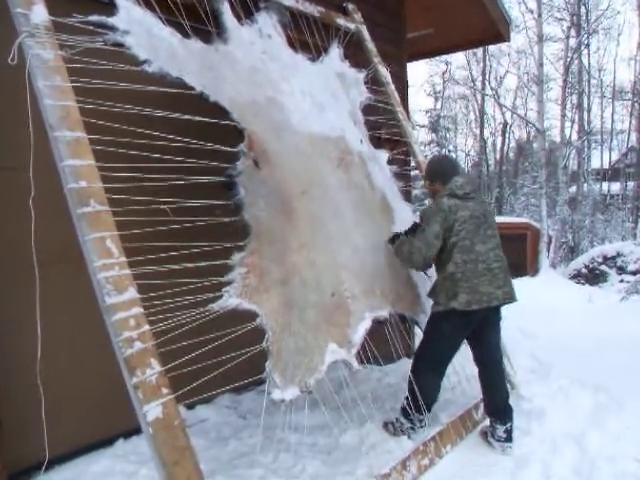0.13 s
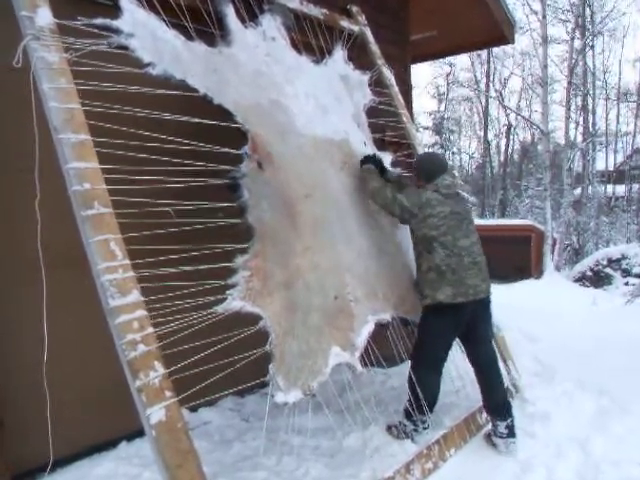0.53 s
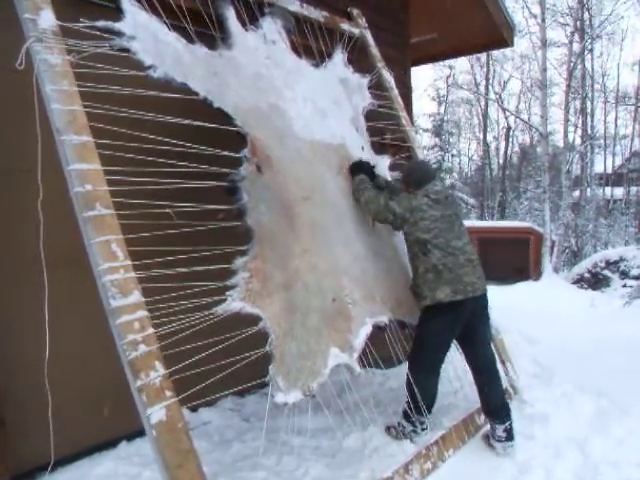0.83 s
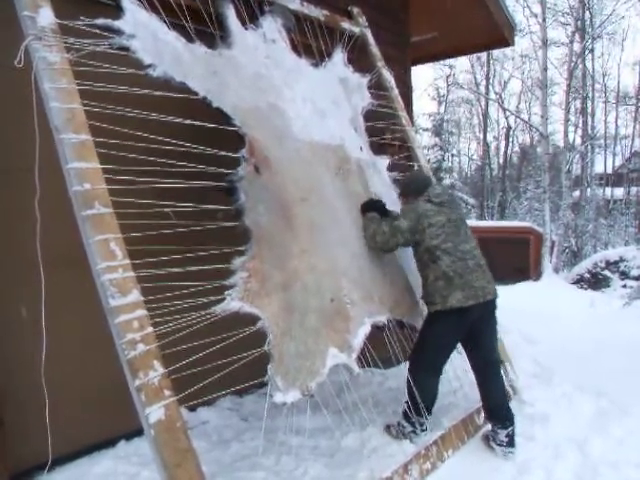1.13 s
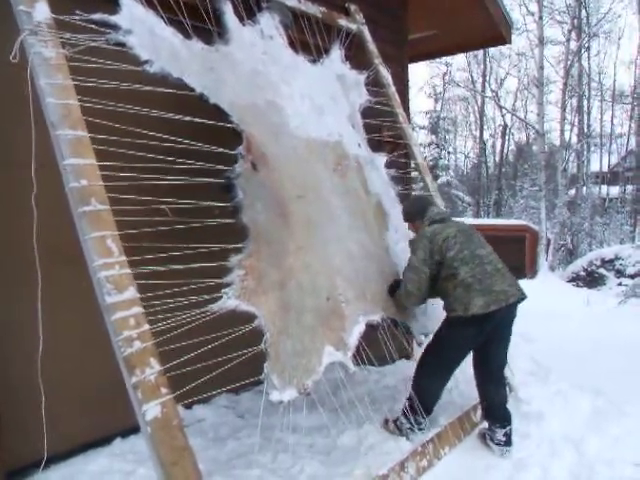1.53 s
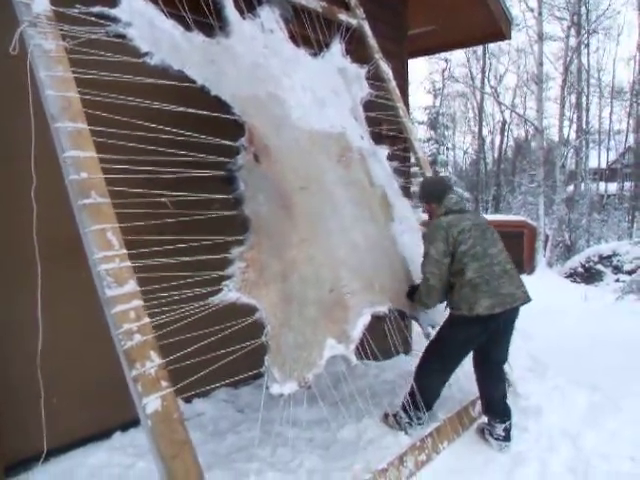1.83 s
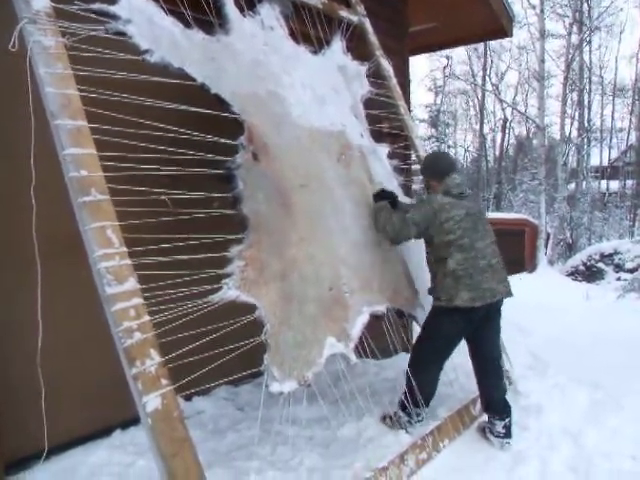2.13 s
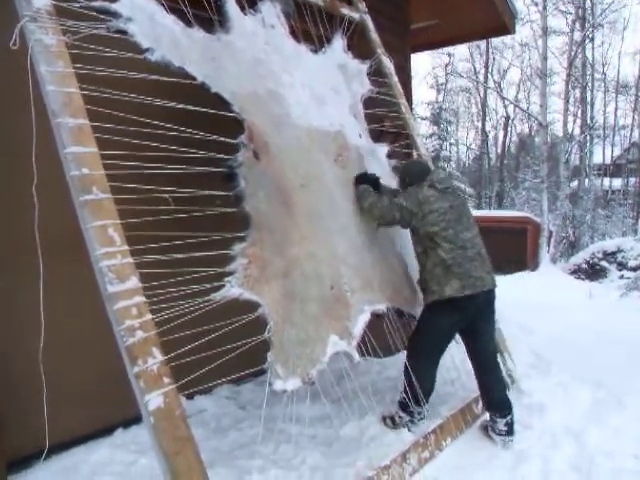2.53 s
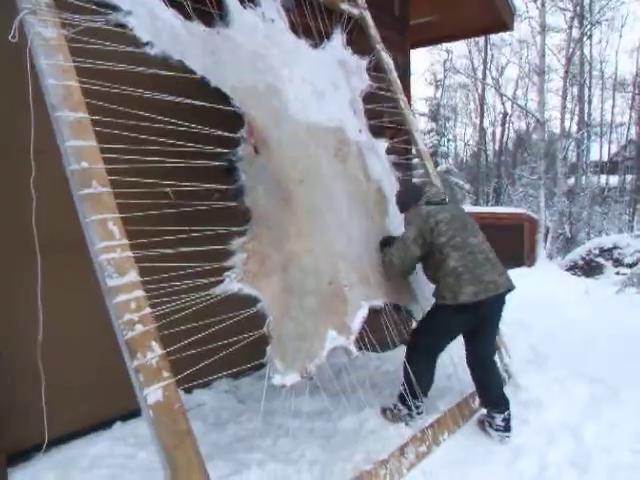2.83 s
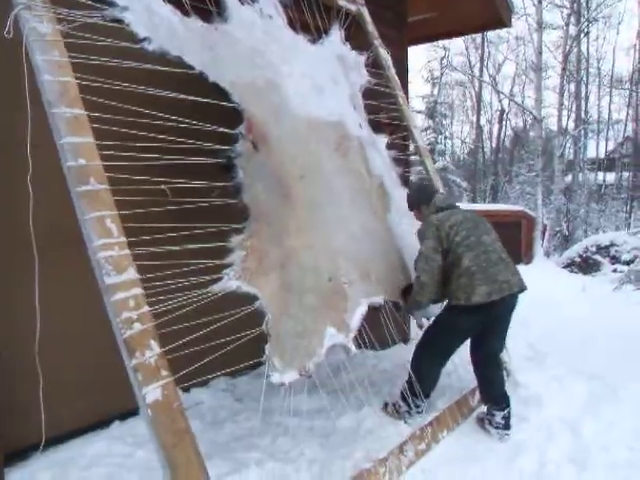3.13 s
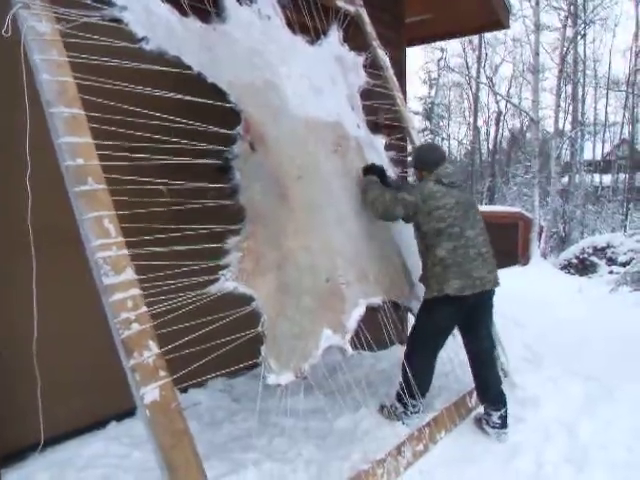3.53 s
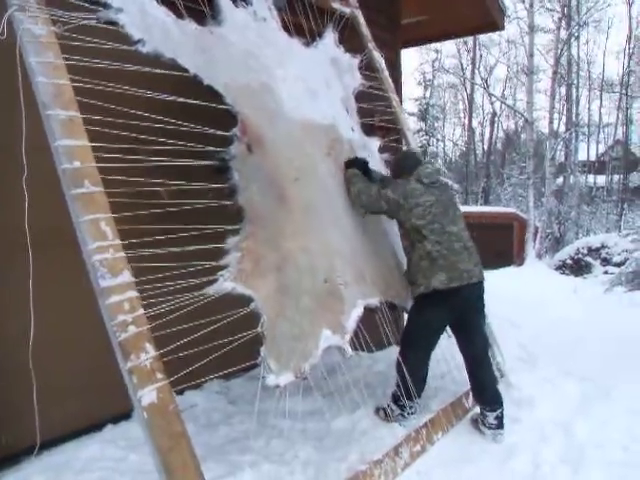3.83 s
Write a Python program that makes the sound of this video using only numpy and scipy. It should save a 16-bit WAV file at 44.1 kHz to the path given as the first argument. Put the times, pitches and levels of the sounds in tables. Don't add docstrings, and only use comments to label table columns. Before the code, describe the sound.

Long rough scrapes on taut, stiff skin, the first ringing with steel, separated by quiet gaps with faint chirps and a twig-like crack. Dry open yard, lo-fi small camera microphone, a loud plastic click before the last scrape.

```python
import sys
import numpy as np
from scipy import signal
from scipy.io import wavfile
from scipy.ndimage import uniform_filter1d, map_coordinates

SR = 44100
rng = np.random.default_rng(int(sys.argv[2]) if len(sys.argv) > 2 else 0)


def elevation(decibels):
    levels = np.asarray(decibels, float)
    return 10 ** (levels / 20)


def generate_wav(signal):
    frames = np.transpose(np.atleast_2d(signal))
    scaled = np.clip(frames, -1, 1) * 32767
    pcm = np.round(scaled).astype(np.int16)
    wavfile.write(sys.argv[1], SR, pcm)


N = 176400
T = np.arange(N) / SR

# (time [s], pressure [dB], edge brightness [dB],
# drumming of the skin [dB], shaking of the frame [dB])
PULL_1_START = [
    (0.79, -58.5, -13, -15, -29),
    (0.842, -47.5, 2, 3.5, -30),
    (0.87, -47, -6.5, -21, -53),
    (0.896, -41, -2, -12, -11),
    (0.998, -39, -4.5, 3.5, -42.5),
    (1.032, -40.5, -1, -2, -8.5),
    (1.144, -33, -4, 4, -11),
    (1.176, -30.5, -5.5, -5, -18),
    (1.2, -38, 0, 0, -11),
]
PULL_1_MIDDLE = [
    (1.2, -40, 2, -10, -14),
    (1.353, -32.5, -5, -5, -14),
    (1.374, -35, -2.5, -8.5, -28),
    (1.515, -35, -1, -6, -14.5),
    (1.612, -28.5, -7, -8, -14),
    (1.654, -38, -4.5, -4, -19.5),
    (1.681, -36.5, -6, -4, -18.5),
]
PULL_1_END = [
    (1.68, -18, -7, -8, -16),
    (1.693, -42, -0.5, -3, -13),
    (1.738, -35, -4, -31.5, -12.5),
    (1.754, -37.5, 2, -29, -20),
    (1.798, -33.5, 1, -19, -23),
    (1.92, -67.5, -8, -12, -9.5),
    (1.92, -63.5, -8.5, -21, -14),
]
PULL_2_START = [
    (2.47, -71, -8, 21, -4),
    (2.5, -46.5, -4, -7, -12.5),
    (2.634, -33, -6.5, 7.5, -10),
    (2.682, -35.5, -1, -5.5, -12.5),
    (2.798, -30.5, -7, -4, -25),
    (2.836, -36, 0, -13.5, -10.5),
    (2.892, -29.5, -8, -22, -39),
    (2.9, -38, 1.5, -3.5, -15),
]
PULL_2_END = [
    (2.9, -36, -2, -13, -21),
    (2.948, -32, -3, -9.5, -15.5),
    (3.032, -28, -6.5, -10, -12),
    (3.086, -41, -3.5, 0.5, -10.5),
    (3.15, -36.5, -3.5, -20, -17),
    (3.166, -29, -11, -13.5, -18),
    (3.2, -36, -2, -6.5, -17),
    (3.256, -56, -0.5, -20.5, -10),
    (3.3, -64, 11, -14.5, -0.5),
]
PULL_3 = [
    (3.829, -64, 10.5, -12.5, -11),
    (3.848, -42, -24, -18, -40.5),
    (3.857, -47.5, -6, -4, -5.5),
    (3.983, -32.5, -8.5, 5, -5.5),
    (3.99, -34.5, -5, 6, -15.5),
]
STEEL_PULL_DB = [
    0,
    -11,
    -10,
]

# (frequency [Hz], width [Hz], level [dB]) # main rings of the
SKIN = [(795, 240, 1.5), (1045, 240, 1.5), (1309, 290, -1.5), (1915, 640, -6)]
EDGE = [(2353, 530, -5.5), (2850, 550, -7), (3663, 920, -7.5), (4400, 1000, -4), (5400, 2500, -6),
        (6620, 2400, -7), (8480, 2200, 1)]
DRUM = [(182.7, 34, -2.5), (262, 79, -6.5), (310.3, 65, 2.5), (532, 210, -0.5)]
FRAME = [(60, 37, -4.5), (79.2, 66, -2.5), (137.7, 35, -1)]
STEEL = [(2720, 90, -2), (2880, 90, 0), (3690, 80, -3), (4530, 120, -5)]
PATCHES = [(611.7, 26, -10), (841.4, 28, 2.5), (999, 61, 4.5), (1107.6, 26, 0.5), (1355, 45, 0),
           (1492, 46, 0), (1533, 44, -2), (1694, 28, -2.5), (1845, 32, -6.5)]
SLACK = [(606, 280, 0.5), (771.5, 130, -2)]
TIGHT = [(1428, 210, 0.5), (1765, 400, -1.5)]

# (time [s], peak level [dB], brightness [dB])
TAPS = [
    (0.729, -29.5, -2.5),
    (0.978, -23.5, 13),
    (2.436, -27, 0),
    (3.442, -35, 15),
    (3.747, -28.5, -4),
    (3.847, -32.5, 2.5),
]
# (frequency [Hz], level [dB], time to fall 60 dB [s])
TAP_MODES = [(103, -19.5, 0.11), (215, -7, 0.046), (340, 6, 0.018), (513, -17, 0.007), (660, 9, 0.019),
             (940, 0.5, 0.0092), (1420, 1, 0.0017)]
# (time
# [s], peak level [dB], share of lows [dB], pitch factor)
TICKS = [(.0008, -35.5, -30, .9), (.0021, -30.5, -30, 1), (.0082, -27, -31.5, .82),
         (.1245, -37.5, -35, 1.1), (1.954, -42, -16, 0.84), (1.982, -45, -19, .98),
         (2.006, -30.5, -25, .82), (2.0092, -35.5, -25, 1.1), (2.019, -39, -20, .95),
         (2.054, -36.5, -9, .99), (2.088, -37, -11, .9), (2.309, -42, 15.5, 1.3), (2.406, -43.5, 0, 1.1),
         (3.096, -31, -16, 1), (3.323, -34, 10, .9), (3.4405, -38, -20, 0.25), (3.8445, -36.5, -20.5, 0.14),
         (3.7852, -54, 14, 0.89), (3.7876, -40, 14.5, 0.45), (3.7888, -18.5, 20, 1.1),
         (3.7966, -1, -8.5, 1.006)]
# (frequency [Hz], level [dB], time to fall 60 dB [s])
TICK_HIGH = [(7106, 12.5, 0.0026), (5800, -10.5, 0.0051), (4380, -10.5, 0.0036)]
# (frequency [Hz], level [dB], time to fall 60 dB [s])
TICK_LOW = [(2760, 15, 0.0023), (1273, -7.5, 0.011), (1930, -18, 0.018)]
# (time [s], peak level [dB])
CRACKS = [
    (3.5708, -24),
    (3.5691, -18),
    (3.5748, -32.5),
]
# (frequency [Hz], level [dB], time to fall 60 dB [s])
CRACK_MODES = [(2370, 3, 0.005), (4600, 10.5, 0.003), (4060, -4.5, 0.0066), (6650, 2, 0.016),
               (7010, 4.5, 0.0048), (1203, -6, 0.011)]

# (time [s], length [s], first frequency [Hz], settled frequency [Hz], level [dB])
NOTES = [
    (1.307, 0.045, 6470, 6690, -34.5),
    (1.424, 0.03, 6210, 6340, -28.5),
    (2.301, 0.033, 7250, 7795, -42),
    (2.326, .03, 7950, 8030, -39.5),
    (3.1, 0.027, 5980, 6560, -30),
    (3.208, 0.033, 5800, 6490, -30.5),
    (3.277, 0.03, 6400, 6730, -54.5),
]
BUZZES = [
    (0.785, 0.014, 5200, 7100, -50.5),
    (0.584, 0.016, 7400, 6500, -47.5),
    (0.67, 0.016, 7100, 6200, -49),
    (4.4, 0.012, 4800, 4600, -42),
    (0.91, 0.054, 2850, 2500, -44),
    (3.284, 0.0086, 3120, 3110, -39),
    (3.332, .02, 4410, 4280, -51),
]
TRILLS = [
    (0.889, 0.091, 7400, 7790, -36.5),
    (1.472, 0.025, 4400, 4850, -39),
    (3.266, 0.043, 3800, 5050, -43.5),
    (3.316, 0.015, 3315, 4140, -50),
]
STRANDS = [
    (3.254, 0.027, 3935, 5510, -40),
    (3.258, 0.019, 3366, 4600, -42),
    (3.266, .02, 4940, 6320, -38.5),
    (3.266, 0.019, 4275, 5660, -42),
    (3.363, .07, 4224, 5930, -50.5),
    (3.363, .05, 2200, 2850, -60.5),
    (3.368, 0.058, 5130, 5740, -53),
    (3.425, .075, 5290, 5400, -54),
    (3.365, 0.058, 2910, 2710, -57),
    (3.385, 0.11, 2616, 2713, -51),
]

# (frequency [Hz], width [Hz], level [dB])
HUM = [(203.9, 6.5, -65), (312.4, 7.3, -68.5), (404.3, 8.1, -69.5)]
# (frequency [Hz], width [Hz], level [dB])
YARD = [(64.6, 54, -12.5), (123.2, 65, -11), (203, 43, -5), (320.7, 65, -3.5), (621, 400, -3),
        (1495, 1700, -6), (5940, 5900, 0)]

SLIPS_PER_S, SLIP_SPREAD_DB, JUDDER_DB, PATCHY_DB = 4500, -1, 0.5, 1
EDGE_DB, DRUM_DB, FRAME_DB, PATCHES_DB = 4.5, -2.5, 0, -9
LIFT_S, PATCH_DRIFT_S, DULLING_DB_PER_S = 0.073, 0.0012, -6.5
STEEL_DB, STEEL_FADE_DB_PER_S, STEEL_LEAST_DB = -4, -90, -20
SLACK_DB, SLACK_DB_PER_S = -0.5, -21.5
TIGHT_DB, TIGHT_DB_PER_S = -15.5, 10


def unit(x):
    return x / np.sqrt(np.mean(x ** 2))


def band(x, hz, width):
    return signal.lfilter(*signal.iirpeak(hz, hz / width, SR), x)


def walk(rate):
    hold = int(SR / rate)
    levels = np.repeat(rng.standard_normal(N // 20), hold)[:N]
    return 1.3 * uniform_filter1d(uniform_filter1d(levels, hold), hold)


def add(out, start_s, x):
    i = int(start_s * SR)
    out[i:i + len(x)] += x[:len(out) - i]


def ring(modes, gain_db):
    t = T[:2600]
    return sum(elevation(db + gain_db - 60 * t / t60) * np.sin(2 * np.pi * hz * t) for hz, db, t60 in modes)


def body(push, peaks, patchy_db):
    total = 0
    for k, (hz, width, db) in enumerate(peaks):
        tone = unit(band(band(push, hz, width), hz, 2 * width))
        total = total + (-1) ** k * elevation(db + patchy_db * walk(22)) * tone
    return unit(total)


def slip_clicks():
    chance = rng.random((3, N))
    size = elevation(-SLIP_SPREAD_DB * np.log(chance[1]))
    clicks = (chance[0] < SLIPS_PER_S / SR) * size * np.sign(chance[2] - 0.5)
    return clicks * elevation(JUDDER_DB * walk(90))


def scraper():
    slips = slip_clicks()
    main_skin, low_edge, hide_drum, wood, high_edge = (
        body(slips, peaks, PATCHY_DB) for peaks in (SKIN, EDGE[:5], DRUM, FRAME, EDGE[5:]))
    steel, patches = body(slips, STEEL, 4.1), body(slips, PATCHES, 5.5)
    patches = map_coordinates(patches, [(T + PATCH_DRIFT_S * walk(6)) * SR], mode="mirror")
    slack, tight = body(slips, SLACK, PATCHY_DB), body(slips, TIGHT, PATCHY_DB)
    pulls = ([*PULL_1_START, *PULL_1_MIDDLE[1:], *PULL_1_END[1:]], [*PULL_2_START, *PULL_2_END[1:]], PULL_3)
    out = np.zeros(N)
    for rows, ring_db in zip(pulls, STEEL_PULL_DB):
        times, *columns = np.array(rows).T
        press, edge, drum, frame = (np.interp(T, times, column) for column in columns)
        since = T - times[0]
        on = (since >= 0) * np.clip(1 - (T - times[-1]) / LIFT_S, 0, 1)
        blade = low_edge + elevation(1.5 + DULLING_DB_PER_S * since) * high_edge
        steel_db = STEEL_DB + ring_db + STEEL_FADE_DB_PER_S * np.maximum(since - 0.15, 0)
        blade = blade + elevation(np.maximum(steel_db, STEEL_LEAST_DB)) * steel
        travel = np.clip(since, 0, 1)
        skin = main_skin + elevation(SLACK_DB + SLACK_DB_PER_S * travel) * slack
        skin = skin + elevation(TIGHT_DB + TIGHT_DB_PER_S * travel) * tight + elevation(PATCHES_DB) * patches
        rest = elevation(drum + DRUM_DB) * hide_drum + elevation(frame + FRAME_DB) * wood
        out += on * elevation(press) * (skin + elevation(edge + EDGE_DB) * blade + rest)
    return out


def taps():
    out, chance = np.zeros(N), rng.standard_normal((9, 5))
    for (start_s, db, bright_db), luck in zip(TAPS, chance):
        knock = ring(TAP_MODES[:3], 0) + ring(TAP_MODES[3:], bright_db)
        blow = knock.copy()
        for k, size in enumerate(luck):
            bounce_s = 0.0048 * (k + 1 + 0.25 * size)
            add(blow, bounce_s, -0.6 * 0.51 ** k * np.sign(size + 1) * knock)
        add(out, start_s, elevation(db) * blow / np.abs(blow).max())
    return out


def ticks():
    rattle_db, rattle_s, rise_s = -16, 0.003, 0.0003
    out, chance, t = np.zeros(N), rng.standard_normal((30, 900)), T[:900]
    thin = signal.butter(2, 700, "high", fs=SR)
    for (start_s, db, low_db, pitch), noise in zip(TICKS, chance):
        high = ring(np.multiply(TICK_HIGH, [pitch, 1, 1]), 0)
        low = ring(np.multiply(TICK_LOW, [pitch, 1, 1]), low_db)
        snap = (high + low)[:len(t)] * (t / (t + rise_s)) ** 4
        rattle = band(noise, 7100 * pitch, 3800) + elevation(low_db) * band(noise, 2800, 2100)
        rattle = rattle * np.exp(-t / rattle_s) * np.minimum(t / rise_s, 1)
        tick = snap / np.abs(snap).max() + elevation(rattle_db) * rattle
        add(out, start_s, elevation(db) * signal.lfilter(*thin, tick))
    return out


def crack():
    out, rings = np.zeros(N), ring(CRACK_MODES, 0)
    for (start_s, db), noise in zip(CRACKS, rng.standard_normal((5, len(rings)))):
        burst = band(noise, 4000, 7000) * np.exp(-T[:len(rings)] / 0.0015)
        add(out, start_s, elevation(db) * (rings / np.abs(rings).max() + elevation(-3) * burst))
    return out


def wobble(rate):
    return walk(rate) + 1j * walk(rate)


def calls(rows, grain, settle, swell_s):
    out = np.zeros(N)
    for start_s, length, first_hz, last_hz, db in rows:
        t = T - start_s
        hz = last_hz + (first_hz - last_hz) * np.exp(-np.maximum(t, 0) / (settle * length))
        env = np.clip(t / swell_s, 0, 1) * np.clip((length - t) / 0.0057, 0, 1)
        voice = (grain * np.exp(2j * np.pi * np.cumsum(hz) / SR)).real
        out += np.sqrt(2) * elevation(db) * env * voice
    return out


def birds():
    out = calls(NOTES, 1 + 0.9 * wobble(200), settle=0.2, swell_s=0.011)
    out += calls(BUZZES, 0.23 + 0.6 * wobble(460), settle=0.4, swell_s=0.0036)
    out += calls(TRILLS, wobble(900), settle=0.4, swell_s=0.0036)
    out += calls(STRANDS, 0.4 + 0.55 * wobble(450), settle=1, swell_s=0.0036)
    trees = rng.standard_normal(6000) * np.exp(-T[:6000] / 0.025)
    return out + elevation(-9) * signal.fftconvolve(out, trees / np.linalg.norm(trees))[:N]


def hum():
    return sum(elevation(db) * unit(band(rng.standard_normal(N), hz, width)) for hz, width, db in HUM)


def yard():
    return elevation(-54) * body(rng.standard_normal(N), YARD, 0.99)


def scene():
    return (scraper() + taps() + ticks() + crack() + birds() + hum() + yard())[None]


def low_pass(x):
    return signal.sosfilt(signal.butter(12, 9120, fs=SR, output="sos"), x)


def record(dry):
    step, bias = 1 / 128 / np.sqrt(2), 0.087
    low = signal.resample_poly(dry[0], 160, 441)
    low = step * np.floor(low / step + bias)
    kernel = signal.firwin(28 * 441 + 1, 1 / 441, window=("kaiser", 9))
    mix = signal.resample_poly(low, 441, 160, window=kernel)[None, :N]
    return low_pass(mix)


dry = scene()
out = record(dry)
generate_wav(out)
```